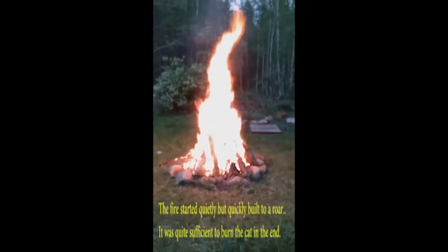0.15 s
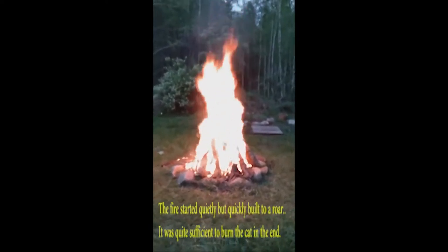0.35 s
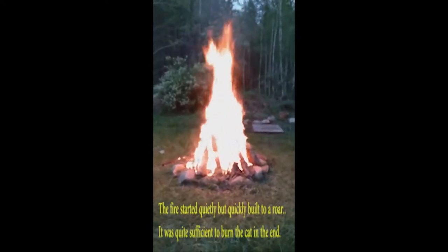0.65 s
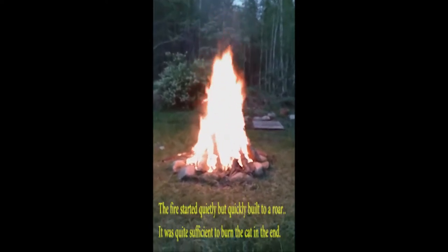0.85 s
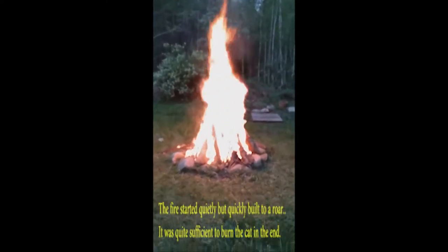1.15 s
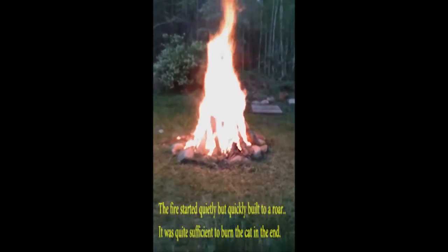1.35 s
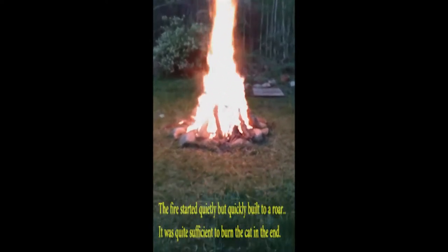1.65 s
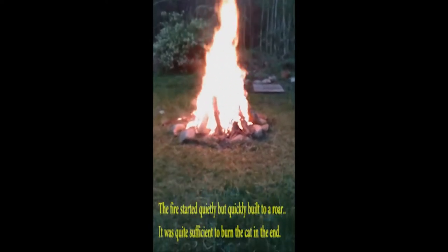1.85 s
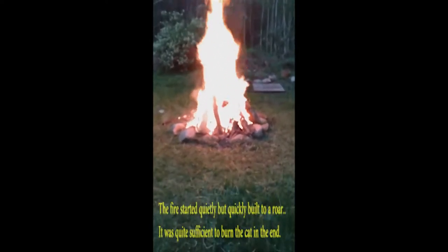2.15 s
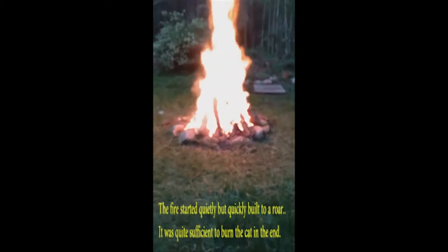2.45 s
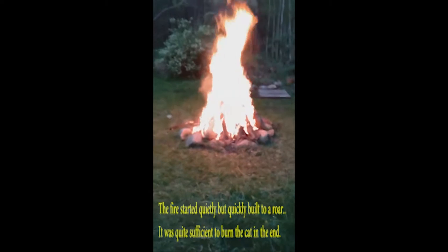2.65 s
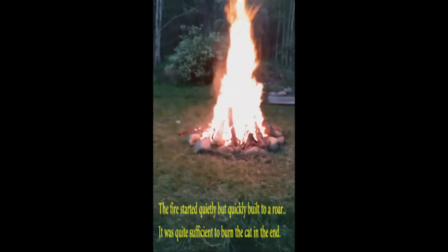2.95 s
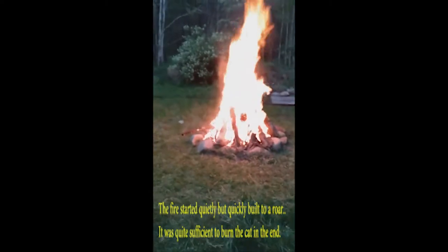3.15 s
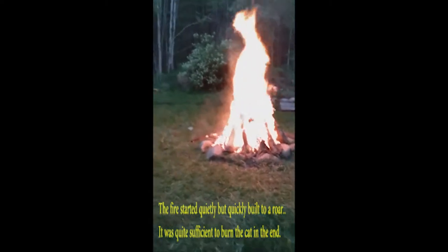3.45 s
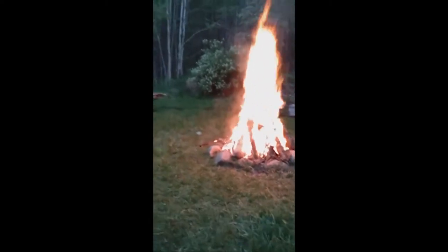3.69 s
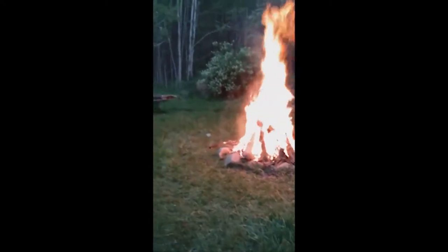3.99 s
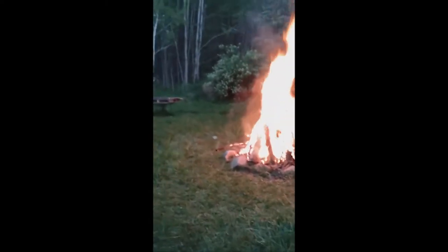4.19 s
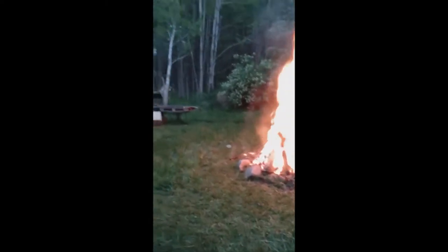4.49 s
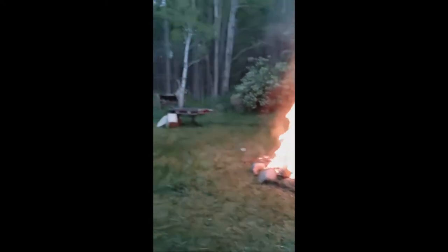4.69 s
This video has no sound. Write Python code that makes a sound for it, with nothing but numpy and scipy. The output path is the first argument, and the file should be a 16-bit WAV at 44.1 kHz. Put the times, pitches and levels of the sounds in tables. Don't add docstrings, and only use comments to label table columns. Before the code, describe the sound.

Outdoor fire in a still, tree-ringed yard, recorded on a phone with a brittle, ringing treble and little above it. A soft, lumpy low rumble runs throughout, with bright snaps, hollow wood clicks and fine crackle on top. A faint breathy steam whistle rises around one second. Popping thickens in the second half, with short steam spurts and a dominant crack near 4.15 seconds.

```python
import sys
import numpy as np
from scipy import signal
from scipy.fft import rfft, irfft, next_fast_len
from scipy.io import wavfile
from scipy.ndimage import uniform_filter1d

SR = 44100
rng = np.random.default_rng(int(sys.argv[2]) if len(sys.argv) > 2 else 0)


def wav_record(signal):
    frames = np.transpose(np.atleast_2d(signal))
    bounded = np.clip(frames, -1, 1)
    quanta = np.round(bounded * 32767).astype(np.int16)
    wavfile.write(sys.argv[1], SR, quanta)


def voltage_ratio(decibels):
    exponent = np.asarray(decibels, float) / 20
    return 10 ** exponent


N = 212914
TIME_S = np.arange(N) / SR

# (time [s], level [dB])
BLAZE = [(0, -2), (.4, -6), (.8, -2.5), (1.25, 0), (2.1, 0), (2.6, 0.5), (3.3, 1), (4.2, 1), (4.5, -2.5),
         (4.83, -3.5)]
# (crest time [s], lift [dB])
GUSTS = [(.11, 3), (1.24, 6), (2.08, 4), (2.28, 2), (2.47, 4.5), (2.62, 2), (3.2, -1), (4.26, 6.5),
         (4.76, 3)]
GUST_BUILD_S, GUST_DROP_S = 0.091, 0.014
# (frequency [Hz], density [dB per Hz])
RUMBLE_SPECTRUM = [(15, -37), (25, -51), (42, -10), (92, 1), (142, -3.5), (198, -12.5), (230, -27),
                   (300, -25), (510, -120)]
# (frequency [Hz], density [dB per Hz])
FLUTTER_SPECTRUM = [(120, -22), (200, -3.5), (311, -5), (361, -10.5), (561, -9.5), (900, -22.5),
                    (1170, -21.5), (1980, -120)]
RUMBLE_DB, FLUTTER_DB = -44.5, -58

# (time [s], snap [dB], splinter re snap [dB], knock re snap [dB], scatter [dB])
LOUD_POPS = [(.1514, -25, -31, -24, 6), (0.559, -25, -27, -30, 5), (0.8039, -17.5, -21.5, -32, -1),
             (1, -23, -27, -45, -6), (1.349, -26, -0.5, -6, -3.5), (1.848, -22.5, -12.5, -16.5, 1.5),
             (1.911, -28, -22, -13.5, 0), (1.9625, -16.5, -23, -27, 4.5), (2.364, -23.5, -25, -27, 6.5),
             (2.425, -18, -18, -23.5, 4), (3.2895, -12, -19.5, -32, 0), (3.428, -21.5, -46, -36, 6),
             (3.6382, -12, -22, -32.5, 1), (3.6498, -14, -7.5, -15.5, 2), (3.756, -32, 2, -21, 6),
             (3.8456, -23.5, -1.5, -15, -2), (3.9138, -18.5, -18.5, -35, 2.1),
             (4.1528, 1.5, -18.5, -17.5, 2.5), (4.1724, -25.5, -26, 0, 2.5), (4.3701, -14, -26, -36, 1.5),
             (4.575, -26, -16, -28, 1.5), (4.723, -21, -24, -35, 3.5), (4.812, -18.5, -21, -40, -5),
             (4.8222, -20, -20, -17, 14.5)]
# (time [s], snap [dB], depth in wood [dB], scatter [dB])
LESSER_SNAPS = [(1.271, -31, -30, 7), (1.4, -31, -35, 13), (1.469, -34, -10, 2), (1.9133, -28, -11.5, 1),
                (2.0936, -28, -15, 3.5), (2.4097, -24.5, -23, 13), (2.591, -24, -32, 7),
                (2.724, -27, -23, -14), (2.9111, -28, -19, 2), (3.1, -31.5, -19, 8), (3.299, -18.5, -18, 6),
                (3.3782, -30.5, -24, 8), (3.4501, -30, -37, -6), (3.6182, -29, -15, -17),
                (3.66, -34, -15, -7), (3.7724, -34.5, -24, 13), (3.9067, -27, -21, 7), (3.944, -19, -24, 0),
                (3.951, -25, -27, 0), (3.9763, -20.5, -25, -18), (3.983, -28, -27, 8),
                (4.186, -20.5, -29, -8), (4.1902, -20.5, -22, -16), (4.243, -30, -10.5, 3),
                (4.2853, -27, -15, 5.5), (4.318, -28, -32, -6), (4.4237, -32.5, -20, 15),
                (4.5175, -34.5, -11.5, 5.5), (4.6571, -32, -20, 10), (4.8277, -28, -8, 5)]
# (time [s], snap [dB], depth in wood [dB])
TICKS = [(.014, -35, -18), (.2193, -40, -19), (0.1965, -35.5, -18), (.255, -35.5, -21), (.346, -36.5, -21),
         (0.513, -42, -22), (0.6278, -38, -24), (.6637, -40, -27), (0.8802, -41, -30), (1.1678, -36, -16),
         (1.494, -32, -30), (1.5402, -37, -22), (1.708, -36, -24), (1.723, -32, -29), (1.809, -36.5, -17),
         (2.1345, -35, -19), (2.2685, -32.5, -14), (2.296, -37, -8), (2.319, -32, -12), (2.3502, -34, -13),
         (2.87, -39, -17), (2.892, -36, -22), (3.09, -34.5, -20), (3.1633, -36, -32), (2.8288, -41, -14),
         (3.4915, -33.5, -24), (4.4073, -31, -14), (4.4817, -44.5, 1), (4.55, -35, -28), (4.6838, -37, -25)]
# (time [s], snap [dB], splinter re snap [dB], knock re
# snap [dB])
CLICKS = [(.1019, -55, -9, -10), (0.1167, -39.5, -7, -11), (0.1458, -48, -22, -10),
          (.4963, -44.5, -12, -14), (.54, -50, -15, -43), (0.7063, -38, -10, -14),
          (.9521, -52, -4, -42), (1.082, -40, -23, -40), (1.3806, -43, -11, -5),
          (1.7612, -35.5, -17, -11), (2.196, -45, -9, -18), (2.3368, -40, -3, -42),
          (2.7121, -46, -23, -3), (3.2178, -48, -4, -40), (3.252, -53.5, -32, 6),
          (3.592, -41, -4, -42), (3.6496, -18, -23, -30), (3.6523, -16.5, -9, -22.5),
          (3.666, -29, -21, -38), (3.733, -47, -20, -8), (4.1449, -44, 2.2, -41),
          (4.2353, -30.5, -6, -42), (4.7305, -41, -7, -47), (4.8058, -39, -6, -19)]
# (frequency [Hz], width [Hz], level [dB])
WOOD_MODES = [(1320, 693, -4), (2555, 1390, -1.5), (615, 270, -7.5), (1790, 2370, -17.5)]
KNOCK_UNDER_SPLINTER_DB = -10.5
SNAP_MS, SNAP_MS_PER_DB, SMALL_SNAP_DB = 0.26, 0.11, -24.5
CRACKLE_COUNT, CRACKLE_DB, CRACKLE_SPREAD_DB = 55, -43.5, 8
CRACKLE_DEPTH_DB, CRACKLE_DEPTH_SPREAD_DB = -30, 10

# (time [s],
# length [s], bright [dB], dull [dB])
HISS_SPURTS = [(1.2, .04, -62, -59), (2.41, 0.034, -38, -72), (3.662, 0.026, -38, -32),
               (3.732, 0.057, -29, -38.5), (3, 0.018, -57, -51), (3.917, 0.016, -39, -63),
               (4.159, 0.0058, -9, -32), (3.293, 0.013, -31, -63), (1.966, 0.017, -32, -66)]

# (crest time [s], lift [dB], build [s])
EMBER_FLARES = [(0, 14, .1), (.75, 7, 0.1), (1.36, 19.5, 0.51), (1.95, 5, 0.16), (2.45, 17.5, 0.42),
                (2.84, 7, 0.27), (3.39, 13, 0.29), (3.66, 13, .1), (3.9, 13, 0.33), (4.35, 16, 0.11),
                (4.65, 5, .2)]
SIZZLE_DB, FLARE_FADE_S = -63.5, 0.16
HISS_DB, HISS_DB_PER_BLAZE_DB = -65.5, 1.26

# (start [s], crest [s], end [s], crest level [dB])
STEAM_JETS = [
    (0.837, 1.35, 1.66, -60.5),
    (3.263, 3.6, 3.63, -68.5),
    (3.699, 4.06, 4.13, -71),
]
# (start pitch [Hz], end pitch [Hz], half width [Hz])
JET_TONES = [
    (2380, 2280, 95),
    (2200, 2200, 160),
    (2200, 2250, 160),
]
JET_SWELL_DB_PER_S, JET_SINK_DB_PER_S, JET_CHOKE_DB = 29, 15, -9.5

# (frequency [Hz], density [dB per Hz])
AIR_SPECTRUM = [(500, 10.5), (900, 2), (1600, 3.5), (3000, -3), (6800, -5), (9000, -9.5), (14000, -24)]
AIR_DB = -70.5

# (frequency [Hz], gain [dB])
PORT_GAIN = [(6000, 0), (7500, 1.5), (8800, 4.5), (9300, 11), (9900, 17.5), (10400, 21), (11200, 19),
             (12000, 13.5), (12800, 12.5), (14000, -11), (16000, 17)]
PORT_LIFT_DB = 20
TOP_HZ = 13050


def curve(table):
    s, *columns = np.transpose(table)
    return [np.interp(TIME_S, s, c) for c in columns]


def unit(x):
    return x / np.sqrt(np.mean(x ** 2))


def band(x, lo_hz, hi_hz, order=2):
    edges_hz = [lo_hz, min(hi_hz, 0.49 * SR)]
    return signal.sosfilt(signal.butter(order, edges_hz, "band", fs=SR, output="sos"), x)


def walk(rate_hz):
    hold = int(SR / rate_hz)
    steps = np.repeat(rng.standard_normal(N // hold + 1), hold)
    slewed = uniform_filter1d(uniform_filter1d(steps, hold), hold)
    return unit(slewed[:N])


def coloured(spectrum, flicker_db, rate_hz):
    hz, db = np.transpose(spectrum)
    size = next_fast_len(N, True)
    f_hz = np.maximum(np.arange(size // 2 + 1) * SR / size, 1)
    gain = voltage_ratio(np.interp(np.log(f_hz), np.log(hz), db, -120, -120))
    noise = rfft(rng.standard_normal(N), size) * gain
    half_octave = 2 * np.log2(f_hz / 16)
    out = np.zeros(N)
    for k in range(21):
        weight = np.clip(1 - abs(half_octave - k), 0, 1) ** 0.5
        part = irfft(noise * weight, size)[:N]
        out += part * voltage_ratio(flicker_db * walk(rate_hz))
    return unit(out)


def crests(s, lift_db, build_s, drop_s):
    late_s = TIME_S - np.c_[s]
    shape = np.exp(np.where(late_s < 0, late_s / np.c_[build_s], -late_s / drop_s))
    return np.sum(np.c_[lift_db] * shape, axis=0)


def place(times_s, shapes):
    out = np.zeros(N + shapes.shape[1])
    for start, shape in zip(np.clip(times_s * SR, 0, N).astype(int), shapes):
        out[start:start + len(shape)] += shape
    return out[:N]


def flames():
    gust_db = crests(*np.transpose(GUSTS), [GUST_BUILD_S], GUST_DROP_S)
    rumble = voltage_ratio(RUMBLE_DB + gust_db) * coloured(RUMBLE_SPECTRUM, flicker_db=1.0, rate_hz=14)
    flutter = voltage_ratio(FLUTTER_DB) * coloured(FLUTTER_SPECTRUM, flicker_db=2.5, rate_hz=22)
    blaze_db = curve(BLAZE)[0]
    return voltage_ratio(blaze_db) * (rumble + flutter)


def cracks(count, decay_ms, lo_hz, hi_hz):
    t_ms = np.arange(384) / SR * 1000
    envelope = (1 - np.exp(-t_ms / (0.93 * decay_ms))) ** 2 * np.exp(-t_ms / decay_ms)
    shapes = rng.standard_normal((count, 384)) * envelope
    energy = np.sum(band(shapes, lo_hz, hi_hz) ** 2, axis=1, keepdims=True)
    return shapes / np.sqrt(energy)


def burst_ms(snap_db):
    return np.c_[SNAP_MS + SNAP_MS_PER_DB * np.clip(snap_db - SMALL_SNAP_DB, 0, 14)]


def yard(count, fast_s, slow_s, slow_db, length_s):
    t_s = TIME_S[:int(length_s * SR)]
    n = len(t_s)
    swell = 0.32 + 0.52 * np.clip((t_s - 0.004) / 0.0039, 0, 1)
    fade = voltage_ratio(-60 * t_s / fast_s) + voltage_ratio(slow_db - 60 * t_s / slow_s)
    grain = voltage_ratio(2.0 * rng.standard_normal((count, n // 24 + 1)))
    grain = grain.repeat(24, axis=1)[:, :n]
    return swell * fade * grain * rng.standard_normal((count, n))


def pop_layers(table, scatter_db, snap_ms, length_s):
    s, snap_db, splinter_db, knock_db = np.transpose(table)[:4]
    n = len(s)

    def layer(db, scattered_db, lead_s, crack, returned):
        direct_s = s - lead_s - 0.00084 * np.ravel(snap_ms)
        direct = place(direct_s, crack * voltage_ratio(db)[:, None])
        return direct + place(s, returned * voltage_ratio(db + scatter_db + scattered_db)[:, None])

    snap = layer(snap_db + 14 - PORT_LIFT_DB, -18.0, 0.00018,
                 cracks(n, snap_ms, 10200, 12260),
                 yard(n, 0.029, 0.25, -11.5, length_s))
    splinter = layer(snap_db + splinter_db + 11.5, -17.5, 0.0002,
                     cracks(n, 0.89 * snap_ms, 2200, 10300),
                     yard(n, 0.024, 0.27, -10.5, length_s))
    knock = layer(snap_db + knock_db + 24.0, -31, -0.0006,
                  voltage_ratio(-8) * abs(cracks(n, 0.045, 510, 7150)),
                  yard(n, 0.094, 0.25, -6.5, length_s))
    wood = sum(voltage_ratio(db) * band(knock, hz - width_hz / 2, hz + width_hz / 2)
               for hz, width_hz, db in WOOD_MODES)
    return band(snap, 9700, 22100) + band(splinter, 4120, 8730) + wood


def from_depth(s, snap_db, depth_db):
    return np.c_[s, snap_db, depth_db, depth_db + KNOCK_UNDER_SPLINTER_DB]


def crackle():
    s = (np.arange(CRACKLE_COUNT) + rng.random(CRACKLE_COUNT) + 1) * TIME_S[-1] / (CRACKLE_COUNT + 1)
    size, depth = np.tanh(rng.standard_normal((CRACKLE_COUNT, 2))).T
    snap_db = CRACKLE_DB + CRACKLE_SPREAD_DB * size
    depth_db = CRACKLE_DEPTH_DB + CRACKLE_DEPTH_SPREAD_DB * depth
    return from_depth(s, snap_db, depth_db)


def pops():
    _, loud_db, _, _, loud_scatter_db = np.transpose(LOUD_POPS)
    loud = pop_layers(LOUD_POPS, loud_scatter_db, burst_ms(loud_db), length_s=0.34)
    s, snap_db, depth_db, scatter_db = np.transpose(LESSER_SNAPS)
    lesser = pop_layers(from_depth(s, snap_db, depth_db), scatter_db, burst_ms(snap_db), length_s=0.34)
    small_table = np.r_[from_depth(*np.transpose(TICKS)), CLICKS]
    small = pop_layers(small_table, 1.5, 0.36, length_s=0.08)
    faint = pop_layers(crackle(), 1.5, 0.36, length_s=0.087)
    return loud + lesser + small + faint


def spurts():
    out = np.zeros(N)
    for s, length_s, bright_db, dull_db in HISS_SPURTS:
        n = int(length_s * SR)
        ragged = voltage_ratio(3.5 * rng.standard_normal(200).repeat(30)[:n]) * np.hanning(n) ** 0.076
        air = ragged * rng.standard_normal(6000)[:n]
        bright = voltage_ratio(bright_db - PORT_LIFT_DB + 3) * band(air, 8500, 24000)
        dull = voltage_ratio(dull_db - 9) * band(air, 1260, 7300, order=1)
        out += place(np.array([s]), (bright + dull)[None])
    return out


def embers():
    sizzle_db = SIZZLE_DB + crests(*np.transpose(EMBER_FLARES), FLARE_FADE_S)
    hiss_db = HISS_DB + HISS_DB_PER_BLAZE_DB * curve(BLAZE)[0]
    sparse = rng.random(N) < 0.04
    grains = sparse * rng.standard_normal(N) * voltage_ratio(3.26 * rng.exponential(size=N))
    grains = signal.fftconvolve(grains, cracks(1, 0.3, 900, 13000)[0])[:N]
    fizz = unit(grains) + 1.67 * rng.standard_normal(N)
    bright = unit(band(fizz, 6500, 13500)) * voltage_ratio(sizzle_db - PORT_LIFT_DB - 4.0)
    dull = unit(band(fizz, 670, 5100, order=1)) * voltage_ratio(hiss_db)
    return (bright + dull) * voltage_ratio(1.2 * walk(25.23))


def steam_jets():
    out = np.zeros(N)
    for (start_s, crest_s, end_s, db), (start_hz, end_hz, half_hz) in zip(STEAM_JETS, JET_TONES):
        pitch_hz = np.interp(TIME_S, [start_s, end_s], [start_hz, end_hz])
        phase = 2 * np.pi * np.cumsum(pitch_hz) / SR
        wobble = band(rng.standard_normal((2, N)), 0.77, half_hz)
        tone = unit(wobble[0] * np.cos(phase) + wobble[1] * np.sin(phase))
        fade = np.clip(np.minimum(TIME_S - start_s, end_s - TIME_S) / 0.075, 0, 1)
        late_s = TIME_S - crest_s
        swell_db = np.minimum(JET_SWELL_DB_PER_S * late_s, -JET_SINK_DB_PER_S * late_s)
        choke_db = JET_CHOKE_DB * np.clip(late_s / 0.025, 0, 1)
        out += tone * fade * voltage_ratio(db + swell_db + choke_db)
    return out


def evening_air():
    return voltage_ratio(AIR_DB) * coloured(AIR_SPECTRUM, flicker_db=3.5, rate_hz=7.6)


def scene():
    return (flames() + pops() + spurts() + embers() + steam_jets() + evening_air())[None]


def port(x):
    hz, db = np.transpose(PORT_GAIN)
    gain = voltage_ratio(np.interp(np.arange(513) * SR / 1024, hz, db))
    cepstrum = irfft(np.log(gain))
    cepstrum[1:512] *= 2
    cepstrum[513:] = 0
    response = irfft(np.exp(rfft(cepstrum)))[None, :512]
    return signal.fftconvolve(x, response)[:, :N]


def low_pass(x):
    return signal.sosfilt(signal.butter(12, 13050, fs=SR, output="sos"), x)


def record(dry):
    top_cut = signal.ellip(6, 0.1, 30, TOP_HZ, fs=SR, output="sos")
    heard = signal.sosfiltfilt(top_cut, port(dry))
    return low_pass(np.clip(heard, -1, 1))


dry = scene()
out = record(dry)
wav_record(out)
```